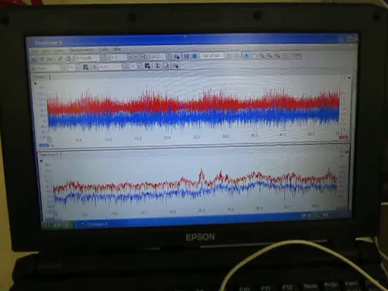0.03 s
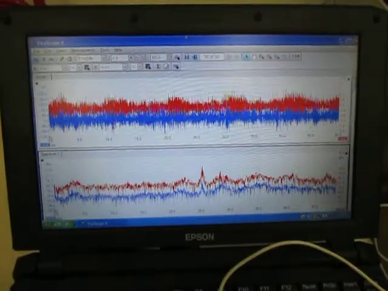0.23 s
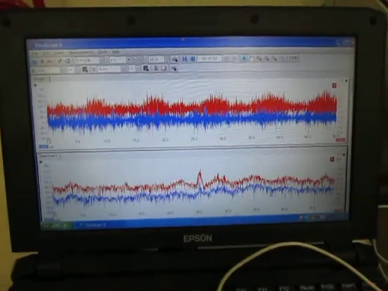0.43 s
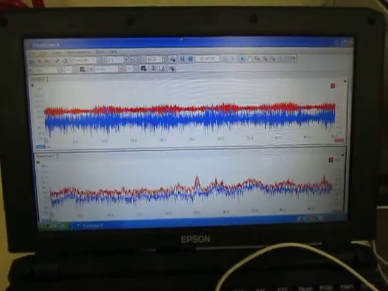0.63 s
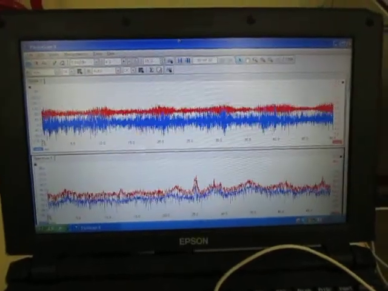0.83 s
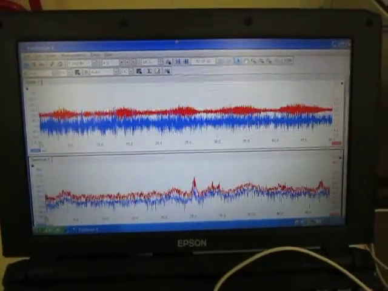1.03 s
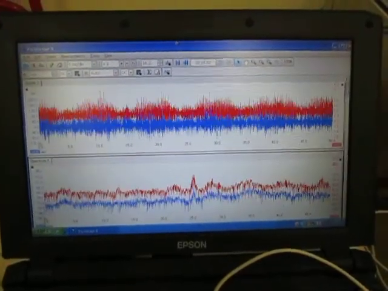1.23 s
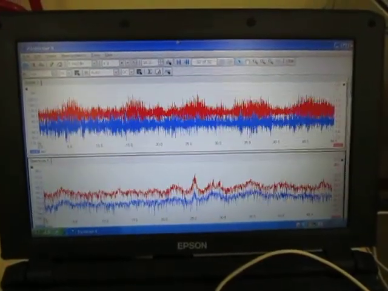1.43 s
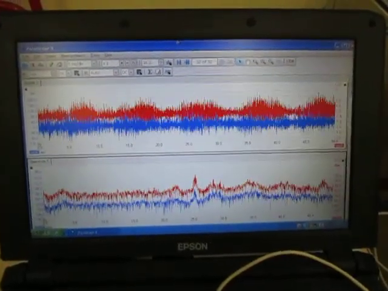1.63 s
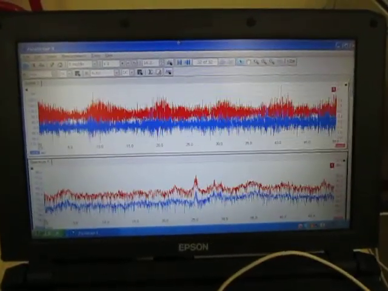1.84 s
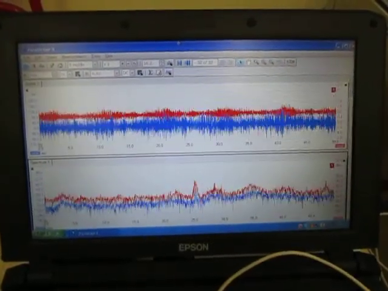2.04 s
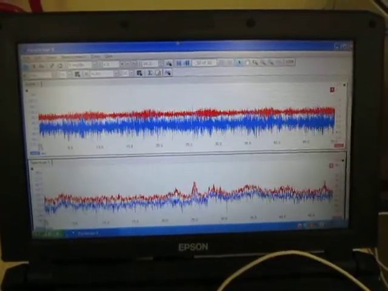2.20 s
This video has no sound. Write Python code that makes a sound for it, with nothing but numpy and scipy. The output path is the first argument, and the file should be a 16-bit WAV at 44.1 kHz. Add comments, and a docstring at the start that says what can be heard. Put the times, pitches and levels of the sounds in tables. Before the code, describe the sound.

Ultrasonic tank drones close by with a throbbing low hum, buzzing treble and hissing high whine

```python
"""A quarter second of silence, then an ultrasonic tank in a laboratory opens at full strength, close by.
Its drive pulses with the rectified mains and sweeps in pitch a little slower. Sums and differences of the
two rates make a throbbing hum; unsteady tones make a buzzing comb; coloured noise makes cavitation hiss,
a narrow whine and a rattle of the walls. A pump and the room rumble below to the end."""
import sys
import numpy as np
from scipy import signal
from scipy.fft import rfft, irfft, next_fast_len
from scipy.io import wavfile
from scipy.ndimage import uniform_filter1d, map_coordinates

SR = 44100
rng = np.random.default_rng(int(sys.argv[2]) if len(sys.argv) > 2 else 0)


def to_wav(sig):
    """Store sig (one row per channel, or 1-D mono) as 16-bit WAV at the path in sys.argv[1].

    Samples outside -1..1 are clipped; the rate is SR.
    """
    pcm = np.clip(np.atleast_2d(sig), -1, 1) * 32767
    pcm = np.round(pcm).astype(np.int16)
    wavfile.write(sys.argv[1], SR, pcm.T)  # frames by channels


def amplitude_ratio(level_db):
    """Convert a level in decibels to the matching linear amplitude (field) ratio."""
    exponent = np.asarray(level_db, float) / 20
    return 10 ** exponent


N = 100018

PULSE_HZ, SWEEP_HZ = 99.95, 90.6  # rectified mains, pitch sweep
PULSE_PEAK_S, SWEEP_PEAK_S, THROB_PEAK_S = 1.8013, 1.8074, 1.829  # one moment when each cycle peaks


def unit(x):
    """Scale to rms 1."""
    return x / np.sqrt(np.mean(np.abs(x) ** 2) + 1e-20)


def curves(rows):
    """One value per sample for each column after the time."""
    times, *columns = np.transpose(rows)
    return np.array([np.interp(np.arange(N) / SR, times, column) for column in columns])


def wobble(rate):
    """A smooth random curve, rate knots a second (at most 60)."""
    knots = rng.standard_normal(int(N / SR * 60) + 4)
    return map_coordinates(knots, [np.arange(N) * min(rate, 60) / SR])


def cycle(hz, peak_s):
    """Phase in radians of a cycle that peaks at peak_s."""
    return 2 * np.pi * hz * (np.arange(N) / SR - peak_s)


def filtered(x, response):
    """x shaped by a gain that depends on frequency."""
    size = next_fast_len(N + 8192)
    spectrum = rfft(x, size) * response(np.fft.rfftfreq(size, 1 / SR))
    return irfft(spectrum, size)[..., :N]


def rush(colour, patchy_db):
    """Coloured noise of rms 1 whose gain varies in random patches of time and frequency."""
    grains = signal.stft(rng.standard_normal(N), nperseg=512)[2]
    patches = uniform_filter1d(rng.standard_normal(grains.shape), size=6, axis=0)
    patches = uniform_filter1d(patches, size=8, axis=1)
    noise = signal.istft(grains * amplitude_ratio(patchy_db * unit(patches)), nperseg=512)[1][:N]
    f, db = np.transpose(colour)
    return unit(filtered(noise, lambda hz: amplitude_ratio(np.interp(np.log(hz + 1), np.log(f + 1), db, -120, -120))))


def throb(depth_db, lag_s=0.):
    """Gain that swells and sinks by depth_db at the difference of the two rates."""
    return amplitude_ratio(depth_db * np.cos(cycle(PULSE_HZ - SWEEP_HZ, THROB_PEAK_S + lag_s)))


def pulsing(depth_db, lag_s, times=1):
    """Gain that swells and sinks by depth_db, a whole number of times per mains pulse."""
    return amplitude_ratio(depth_db * np.cos(times * cycle(PULSE_HZ, PULSE_PEAK_S + lag_s)))


# Hum lines: (multiple of pulse rate, multiple of sweep rate, family = swell column, counted from 0)
HUM_LINES = [(1, 0, 0), (2, 0, 1), (6, 0, 5), (7, 0, 5), (8, 0, 5), (11, 0, 5), (14, 0, 5), (15, 0, 3),
             (16, 0, 3), (3, 0, 2), (4, 0, 2), (5, 0, 2), (0, 2, 3), (1, 2, 3), (1, 3, 3), (1, 4, 3),
             (-1, 2, 4), (0, 4, 5), (3, 2, 3), (4, 2, 5), (0, 1, 4), (1, 1, 4), (2, 1, 4), (0, 3, 4),
             (3, 1, 3), (2, 2, 5), (4, 1, 5), (2, 3, 4), (5, 1, 5), (7, 1, 5), (3, -1, 1), (15, 1, 3)]
# Balance of those lines, in the same order: relative level [dB]
HUM_LINE_DB = [-24, -27, -42, -46, -51, -56, -57, -50, -55, -33, -37, -46, -29, -31, -36, -45, -39, -43,
               -47, -47, -32, -34, -32, -34, -35, -41, -45, -46, -47, -49, -40, -55]
# Swell of families 0 to 4: (time [s], lowest mains line [dB], second mains line [dB],
# middle mains lines [dB], strong mixes [dB], other mixes [dB])
HUM_SWELL = [(0.3, -2.72, 2.82, 1.12, 3.24, 2.91), (0.44, 1.22, 3.87, 2.47, 2.64, 2.98),
             (0.57, 1.15, 0.75, -1.44, 1.36, 3.62), (0.7, -8.51, 2.76, 0.42, -1.26, 2.08),
             (0.84, -7.75, -3.54, 0.23, -2.98, 0.97), (0.98, -3.32, -12.48, 4.05, -3.99, -0.99),
             (1.11, -8.49, -8.71, 2.73, -7.24, -2.81), (1.25, -4.71, -7.32, 1.86, -3.82, -1.56),
             (1.38, -0.17, -5.21, 2.53, 0.92, 1.47), (1.52, 0.68, -2.22, -1.77, 0.82, -1.42),
             (1.65, 3.94, 1.95, -11.54, 1.63, -2.71), (1.78, 2.31, 1.68, -7.36, 0.44, -5.49),
             (1.92, 2.41, 1.66, -9.39, -0.72, -4.12), (2.06, 0.08, -0.13, -8.97, -0.2, -8.95),
             (2.19, -1.39, 0.25, -8.05, 0.54, -1.6)]
# Swell of family 5, the upper lines: (time [s], level [dB])
UPPER_SWELL = [(.3, -4), (.8, -6), (1.15, -4), (1.4, 3), (1.75, 2), (1.95, 0), (2.26, 1.5)]
# How far lines stray in phase, before they come nearly into step:
# (time [s], lead of lowest lines [rad], lead of higher mains lines [rad], trail of mixes [rad])
HUM_SPREAD = [(.3, 1.3, 2.1, 2.3), (.6, 1.1, 2.6, 2.3), (.8, .4, 2.3, 1.7), (1.0, -.5, 1.7, 1.2),
              (1.2, -.7, 1.6, .9), (1.4, -.2, 1.3, .1), (1.7, .01, .3, -.2), (2.26, -.2, -.3, .01)]


def hum():
    """Sums and differences of pulse and sweep rate, tied in phase, each line a little unsteady."""
    lower_lead, upper_lead = 1.8, .05  # radians
    wander, jitter, roughness = .25, .2, .17  # slow and fast phase drift in radians, share of size
    pulse, sweep = cycle(PULSE_HZ, PULSE_PEAK_S), cycle(SWEEP_HZ, SWEEP_PEAK_S)
    family_db = [*curves(HUM_SWELL), *curves(UPPER_SWELL)]
    lowest, higher, trail = curves(HUM_SPREAD)
    lines = np.zeros(N)
    for (m, n, family), db in zip(HUM_LINES, HUM_LINE_DB):
        if family == 5:
            lead = upper_lead
        elif m + n == 1:
            lead = lower_lead + lowest
        else:
            lead = lower_lead + (-trail if n else higher)
        lead = lead + wander * wobble(2.89) + jitter * wobble(12)
        size = amplitude_ratio(db + family_db[family]) * (1 + roughness * wobble(13.97))
        lines += size * np.cos(m * pulse + n * sweep + lead)
    return amplitude_ratio(.1) * np.sqrt(2) * lines


# Swell of the buzz: (time [s], relative level [dB])
BUZZ_SWELL = [(0.3, -25.5), (0.44, -27.5), (0.57, -29.5), (0.7, -27.5), (0.84, -29.5), (0.98, -28.5),
              (1.11, -28), (1.25, -26.5), (1.38, -26.5), (1.52, -26), (1.65, -27.5), (1.78, -29.5),
              (1.92, -29), (2.06, -27.5), (2.19, -28)]
# Colour of its noise: (frequency [Hz], relative level [dB])
BUZZ_COLOUR = [(2470, -51), (4200, -14), (5530, -3.5), (6410, -0.5), (7110, 0), (7800, -6), (10100, -44),
               (17200, -120)]
# Comb of the swept, pulsed drive: (frequency [Hz], relative level [dB])
BUZZ_COMB = [(5034, -54), (5235, -52), (5330, -50), (5430, -46), (5525, -47), (5630, -52), (5729, -44),
             (5830, -51), (5989, -46), (6089, -47), (6180, -45), (6279.5, -42), (6361, -44), (6443, -46),
             (6490, -48), (6540, -43), (6634, -44), (6735, -46), (6834, -43), (6935, -46), (6988, -44),
             (7097, -46), (7200, -44), (7295, -46), (7389, -45), (7470, -50), (7551, -49), (7633, -51),
             (7689, -51)]


def buzz():
    """A comb of unsteady lines inside its own noise; both beat at the throb rate, the lines deeper."""
    level_db = curves(BUZZ_SWELL)[0]
    comb = np.zeros(N)
    for hz, db in BUZZ_COMB:
        size = amplitude_ratio(db + 2.4 * wobble(3.5))
        comb += size * np.cos(cycle(hz, rng.random()) + 0.83 * wobble(9.05))
    comb *= amplitude_ratio(level_db - level_db.mean() + .3) * throb(3.5)
    noise = amplitude_ratio(level_db - 1.0) * throb(1.8) * rush(BUZZ_COLOUR, patchy_db=1.2)
    return comb + noise


# Swell of the whine: (time [s], level [dB])
WHINE_SWELL = [(0.26, -19), (0.448, -20), (0.51, -24), (0.544, -20), (0.638, -25.5), (0.648, -20),
               (0.732, -22), (0.754, -18), (0.856, -27), (0.878, -23), (0.95, -25.5), (1.072, -20),
               (1.144, -23), (1.25, -21), (1.496, -23), (1.502, -21), (1.708, -21.5), (1.724, -17.5),
               (1.802, -24.5), (1.846, -21.5), (1.914, -24.5), (1.958, -19.5), (1.97, -22.5),
               (2.158, -18.5), (2.22, -23.5), (2.26, -21.5)]
# Colour of the whine: (frequency [Hz], relative level [dB])
WHINE_COLOUR = [(11000, -40), (11600, -16), (12100, -10), (12350, -5), (12540, 0), (12640, -.5),
                (12800, -3.5), (13000, -7), (13150, -12), (13350, -17), (14000, -21), (15000, -25),
                (15800, -27)]


def cavitation_whine():
    """A narrow, noisy whine on top of the bubble hiss, rippling once and twice per mains pulse."""
    ripple = pulsing(1.0, -.002) * pulsing(0.51, 0.0037, times=2)
    noise = rush(WHINE_COLOUR, patchy_db=0.35)
    return amplitude_ratio(curves(WHINE_SWELL)[0]) * throb(0.45, .012) * ripple * noise


# Swell of the hiss: (time [s], relative level [dB])
HISS_SWELL = [(0.26, -24.5), (0.276, -32), (0.342, -27), (0.376, -30.5), (0.538, -31), (0.554, -30.5),
              (0.622, -32), (0.644, -27.5), (0.832, -33), (1.296, -29), (1.328, -33), (1.406, -28.5),
              (1.446, -31.5), (1.506, -28.5), (1.646, -30.5), (1.724, -27), (1.796, -33.5), (1.952, -29.5),
              (2.002, -33), (2.07, -30), (2.12, -29), (2.142, -27.5), (2.226, -31.5), (2.26, -32)]
# Colour of the hiss: (frequency [Hz], relative level [dB])
HISS_COLOUR = [(4530, -45), (7700, -5), (8090, -5), (10500, -4), (11200, -2), (11800, -8), (15300, -33),
               (22000, -120)]


def cavitation_hiss():
    """Bubble hiss: broad treble noise that throbs slightly."""
    return amplitude_ratio(curves(HISS_SWELL)[0] + 1.34) * throb(0.49, .006) * rush(HISS_COLOUR, patchy_db=0.1)


# Swell of the rattle: (time [s], relative level [dB])
RATTLE_SWELL = [(0.26, -32), (0.532, -35), (0.538, -32), (0.588, -35.5), (0.76, -32), (0.788, -34.5),
                (1.038, -35), (1.48, -33.5), (1.49, -29.5), (1.524, -32.5), (1.686, -33), (1.74, -31.5),
                (1.752, -35.5), (2.148, -33), (2.182, -35.5), (2.26, -34)]
# Colour of the rattle: (frequency [Hz], relative level [dB])
RATTLE_COLOUR = [(330, -12), (430, -5), (600, -3), (850, -6), (1500, -10.5), (2200, -13), (3400, -18),
                 (4400, -20), (5700, -38)]


def rattle():
    """The tank walls hiss and rattle: mid-range noise rippling with each mains pulse."""
    ripple = throb(0.45) * pulsing(0.38, -0.00059)
    return amplitude_ratio(curves(RATTLE_SWELL)[0] + 1.5) * ripple * rush(RATTLE_COLOUR, patchy_db=0.8)


# Colour of pump and room: (frequency [Hz], relative level [dB])
RUMBLE_COLOUR = [(10, -14), (25, -7), (33, -7), (48, -1), (66, -8), (120, -6), (140, -7.5), (225, -3),
                 (240, -12), (340, -13), (450, -15), (600, -26)]


def pump():
    """Low rumble of pump and room: bass noise whose level drifts at random around -28 dB."""
    return amplitude_ratio(-28 + 1.7 * wobble(6.15)) * rush(RUMBLE_COLOUR, patchy_db=1.5)


def scene():
    """All sources at one microphone."""
    tank = hum() + buzz() + cavitation_whine() + cavitation_hiss() + rattle()
    return (tank + pump())[None]


def roll_off(x):
    """The treble ends steeply here."""
    return signal.sosfilt(signal.butter(12, 15820, fs=SR, output="sos"), x)


def record(dry):
    """A narrow notch in the treble, a band limit, and silence until the recorder opens."""
    notch_hz, notch_width_hz, notch_db = 7850, 42, -24
    top_hz, open_s, fade_s = 15760, .2425, .001

    def response(hz):
        notch = amplitude_ratio(notch_db / (1 + ((hz - notch_hz) / notch_width_hz) ** 2))
        return notch * (hz < top_hz)

    gate = np.clip((np.arange(N) / SR - open_s) / fade_s, 0, 1)
    mix = filtered(dry, response) * gate
    return roll_off(mix)


dry = scene()
out = record(dry)
to_wav(out)
```